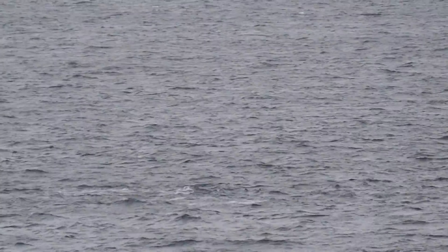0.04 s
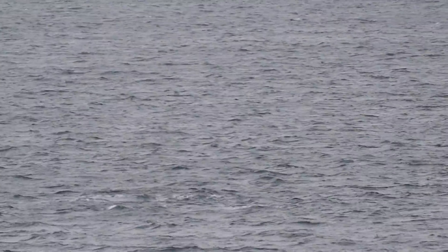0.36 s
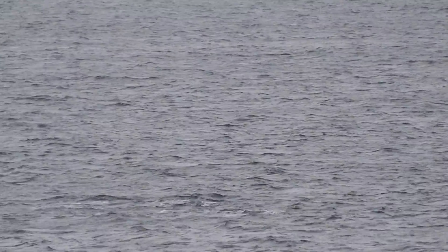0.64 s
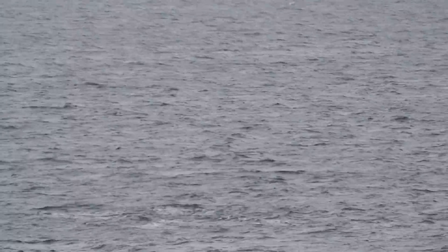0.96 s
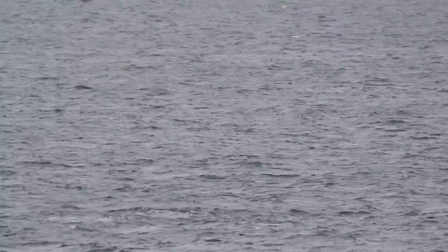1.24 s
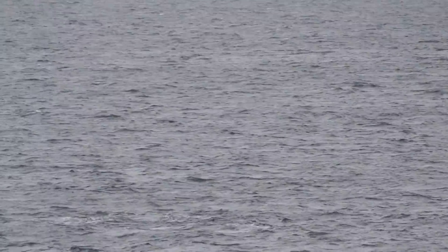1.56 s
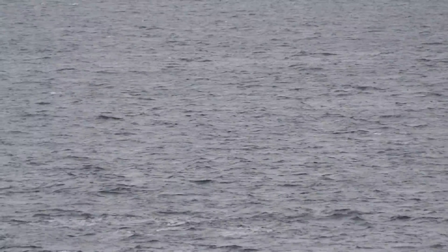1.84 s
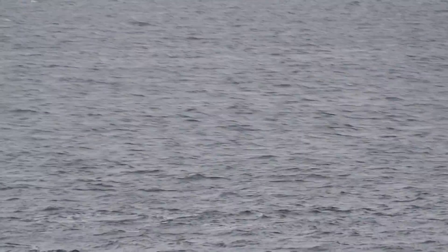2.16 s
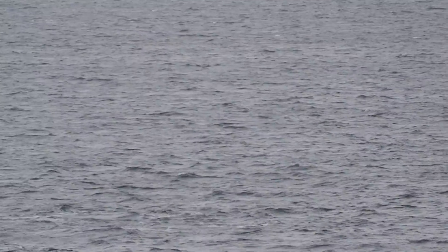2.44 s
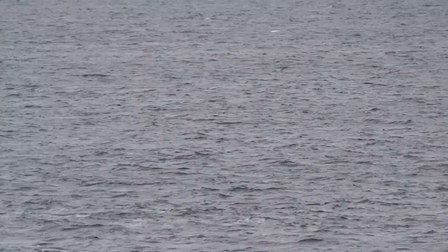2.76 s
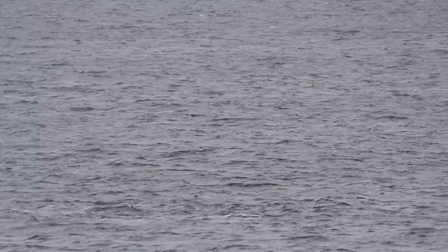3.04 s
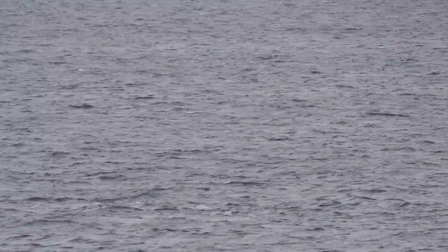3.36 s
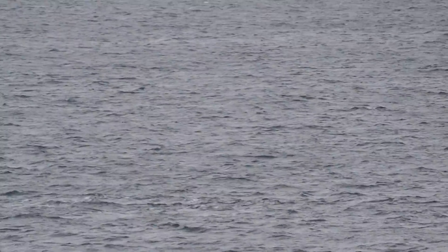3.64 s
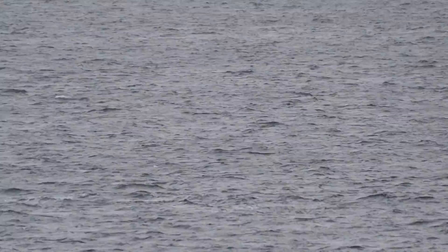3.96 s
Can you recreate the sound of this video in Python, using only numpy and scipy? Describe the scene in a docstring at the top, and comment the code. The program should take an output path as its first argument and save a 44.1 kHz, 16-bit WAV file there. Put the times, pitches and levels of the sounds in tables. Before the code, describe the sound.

Gusty wind buffets the microphone from the start, a loud low rumble with a rough, rapid flutter. Deep thuds come irregularly from about 0.5 to 3 seconds. The hardest gusts rasp and hiss, with brief bright crests near 1 and 1.9 seconds. The heaviest thud lands at 2.5 seconds, just before a sharp spit of air. Gusts continue until the end at 4 seconds, over a barely audible sea wash.

```python
"""Gusty wind off the open sea buffets the two microphone ports of a camera. From the start, big eddies
press on both ports at once (rumble) while smaller ones push one and pull the other (buffeting).
Deep thuds set in at half a second. The hardest gusts tear into a rasp and a thin hiss, with bright
crests near 1 s and 1.9 s. The heaviest thud lands at 2.5 s, just before the loudest spit of air.
The gusts go on to the end, and the faint wash of the water lies under it all."""
import sys
import numpy as np
from scipy import signal
from scipy.fft import rfft, irfft, next_fast_len
from scipy.io import wavfile
from scipy.ndimage import uniform_filter1d, minimum_filter1d, map_coordinates

SR = 44100
rng = np.random.default_rng(int(sys.argv[2]) if len(sys.argv) > 2 else 0)


def log_audio(samples):
    """Write samples as a 16-bit WAV file to the path given in sys.argv[1]."""
    # one column per channel
    frames = np.atleast_2d(samples).T
    # limit to full scale, then quantise
    limited = np.clip(frames, -1, 1)
    pcm = np.round(limited * 32767).astype(np.int16)
    wavfile.write(sys.argv[1], SR, pcm)


N = 176400
TIME = np.arange(N) / SR
FFT_SIZE = next_fast_len(N + 8192)

# Strength of the gusts: (time [s], relative buffeting level [dB], relative rasp level [dB])
GUST_LEVELS = [(0.01, -18.5, -24), (0.03, -21.5, -44), (0.05, -26.5, -36.5), (0.11, -19.5, -36),
               (0.18, -17.5, -25.5), (0.2, -32, -43), (0.22, -17, -25.5), (0.25, -16.5, -25),
               (0.29, -15.0, -34), (0.31, -32, -41), (0.33, -17, -38.5), (0.37, -15.5, -30),
               (0.42, -25, -47), (0.44, -20, -41), (0.46, -36.5, -45), (0.55, -23.5, -44),
               (0.58, -31, -51.0), (0.6, -22, -55), (0.63, -27, -42), (0.64, -17, -46), (0.66, -29.5, -39),
               (0.69, -14.5, -41), (0.71, -28, -37.5), (0.74, -21, -37.5), (0.77, -14.5, -38),
               (0.78, -24.5, -43.5), (0.82, -16, -32), (0.9, -17.5, -28.0), (0.92, -27.5, -44),
               (0.94, -15, -35), (0.96, -43, -43), (0.97, -18.5, -28.5), (1.03, -15.0, -26.5),
               (1.09, -25.5, -32), (1.1, -16, -30), (1.24, -18.5, -35), (1.26, -18.5, -28), (1.3, -13, -25),
               (1.32, -21.5, -30), (1.35, -15, -25), (1.38, -21, -27), (1.47, -15.5, -26.5),
               (1.52, -15.5, -24), (1.54, -16.5, -38), (1.57, -15, -24), (1.61, -18, -37.5),
               (1.63, -31, -46.0), (1.66, -15.5, -27), (1.69, -26.5, -30), (1.74, -15, -21.5),
               (1.79, -19, -32), (1.86, -14.5, -27), (1.92, -21.5, -27.5), (1.97, -12, -27.5),
               (1.99, -17.5, -27), (2.01, -20, -24), (2.02, -22.5, -28), (2.05, -15.5, -34),
               (2.06, -21, -40.5), (2.11, -18.5, -23), (2.17, -20.5, -36), (2.2, -12.5, -22.5),
               (2.22, -25, -41.0), (2.24, -10, -36), (2.26, -28, -40), (2.28, -14, -25.5), (2.32, -27, -41),
               (2.36, -14.5, -37), (2.37, -31, -40), (2.39, -18, -36), (2.41, -24, -39.5),
               (2.44, -13.5, -26.0), (2.47, -26, -42), (2.51, -17.5, -29.5), (2.55, -18.5, -37),
               (2.6, -19.5, -26.5), (2.65, -12, -27.5), (2.67, -25.5, -46.5), (2.7, -14.5, -29),
               (2.75, -30.5, -44), (2.77, -22, -37), (2.8, -20, -28.5), (2.82, -16, -35), (2.85, -35, -47),
               (2.87, -16, -32), (2.91, -19.5, -30.5), (2.95, -17.0, -21.5), (2.97, -14.5, -41.5),
               (3.01, -24.5, -33), (3.03, -18, -21), (3.06, -17.5, -35.5), (3.08, -21.5, -26),
               (3.1, -25, -45), (3.12, -19.5, -27.5), (3.22, -17.5, -27.5), (3.24, -33, -38),
               (3.25, -17, -36), (3.3, -18.5, -26.5), (3.51, -13.5, -29.5), (3.53, -25.5, -33.5),
               (3.55, -14, -34), (3.6, -20.5, -34), (3.65, -25, -34), (3.67, -15.5, -30), (3.69, -15, -41),
               (3.73, -31.5, -48), (3.76, -23, -34), (3.78, -20, -31), (3.79, -24, -38), (3.82, -18, -26),
               (3.9, -18.5, -33.5), (3.99, -16.5, -27.5)]
# Single hard eddies: (time [s], relative buffeting level [dB], relative rasp level [dB])
EDDY_SLAPS = [(0.018, -15, -29), (0.107, -14, -21), (0.381, -11, -23), (0.474, -13, -38), (0.516, -18, -42),
              (0.756, -13, -25), (0.975, -12.5, -24), (1.014, -16, -24), (1.126, -10, -24),
              (1.264, -10, -29), (1.485, -14, -19), (1.526, -13, -22), (1.639, -11, -30), (1.704, -15, -20),
              (1.961, -12.5, -24), (2.113, -8.5, -27), (2.2, -17, -25), (2.279, -16, -24),
              (2.336, -14, -37), (2.389, -11, -36), (2.592, -9.5, -24), (2.71, -14, -28),
              (2.884, -8.5, -33.5), (2.932, -18, -21), (3.021, -14, -28), (3.662, -18.5, -25),
              (3.766, -9, -25), (3.824, -9, -31)]
# Strength of the hiss and of the large eddies' pressure: (time [s], relative level [dB])
HISS_LEVELS = [(0.02, -68), (0.13, -66), (0.24, -60), (0.3, -67), (0.35, -60), (0.41, -67.5), (0.6, -66),
               (0.7, -63), (0.79, -67), (0.84, -61.5), (0.86, -56.5), (0.95, -65.5), (0.97, -59.5),
               (1.04, -55.5), (1.07, -76), (1.1, -58.5), (1.24, -66), (1.28, -56), (1.33, -61), (1.37, -58),
               (1.42, -64), (1.46, -59), (1.49, -54), (1.62, -65), (1.74, -59), (1.8, -65.5), (1.83, -59.5),
               (1.85, -71.5), (1.86, -54.5), (1.87, -67), (1.95, -58), (2.01, -61), (2.07, -74),
               (2.1, -57.5), (2.26, -67.5), (2.28, -59), (2.41, -74), (2.43, -59), (2.52, -75.5),
               (2.55, -74.5), (2.56, -63), (2.58, -64), (2.64, -60.5), (2.67, -66), (2.86, -67),
               (2.95, -61), (2.97, -73.5), (3.03, -57), (3.06, -64.5), (3.25, -64), (3.38, -61),
               (3.52, -67), (3.63, -68.5), (3.66, -63), (3.71, -77), (3.76, -68.5), (3.85, -64),
               (3.91, -68.5), (3.97, -66)]
RUMBLE_LEVELS = [(0.02, -11.5), (0.06, -20.5), (0.14, -15), (0.21, -22.5), (0.28, -19.5), (0.32, -22),
                 (0.38, -15), (0.4, -21.5), (0.52, -20), (0.59, -26.5), (0.64, -18.5), (0.67, -27),
                 (0.73, -22), (0.78, -23.5), (0.8, -19.5), (1.0, -17), (1.12, -16.5), (1.39, -19),
                 (1.41, -14.5), (1.52, -22.5), (1.55, -15.5), (1.61, -19.5), (1.64, -17), (1.72, -22.5),
                 (1.78, -18.5), (1.88, -17.5), (1.91, -18), (1.94, -15), (2.03, -21.5), (2.07, -13),
                 (2.14, -19.5), (2.39, -16), (2.42, -20), (2.69, -18), (2.71, -15.5), (2.74, -26.5),
                 (2.76, -13), (2.84, -27.5), (2.87, -16), (3.03, -20.5), (3.04, -20.5), (3.27, -17.5),
                 (3.3, -19.5), (3.5, -19), (3.52, -26.5), (3.55, -17), (3.63, -24.5), (3.67, -14.5),
                 (3.74, -24.5), (3.76, -14.5), (3.79, -18), (3.98, -17.5)]
# Big eddies that land as a thud: (time [s], level [dB])
EDDY_THUDS = [(.478, -18.5), (.935, -15.5), (1.129, -18), (1.57, -18), (1.645, -15.5), (2.115, -15),
              (2.39, -17.5), (2.495, -12.5), (2.71, -17.5), (2.965, -19)]
# Tearing gust crests and sharp spits of air: (time [s], level [dB], half-width [s])
CREST_TEARS = [(.225, -50, .012), (.868, -45, 0.017), (1.022, -39, 0.012), (1.292, -45, 0.013),
               (1.375, -50, .018), (1.495, -48, 0.034), (1.735, -52, .02), (1.865, -50, .008),
               (1.93, -40.5, 0.0073), (2.945, -47, .016)]
AIR_SPITS = [(.385, -50.5, 0.00079), (0.76, -50, 0.0023), (.972, -46, .0012), (.98, -48.5, 0.0019),
             (1.032, -48, 0.0016), (1.132, -46.5, 0.0015), (1.259, -46.5, 0.0012), (1.526, -49, 0.0017),
             (1.704, -49.5, .0015), (1.862, -48.5, 0.0027), (1.931, -47.5, 0.0061), (2.103, -49, .002),
             (2.117, -45.5, .0015), (2.564, -39.5, 0.0015), (2.602, -46, .0012), (2.934, -50, .0012),
             (3.024, -55, 0.0035), (3.877, -56, 0.0028)]
# Noise spectrum of each source: (frequency [Hz], relative spectral density [dB])
BUFFET_SPECTRUM = [(40, -15.5), (110, -10.5), (200, 1), (330, 0.5), (520, -5), (800, -13.5), (1200, -27),
                   (2200, -56.5), (5000, -97)]
RASP_SPECTRUM = [(250, -52), (600, 7.5), (950, 2), (1400, -7), (2000, -16), (3000, -28), (4500, -39.5),
                 (8000, -53), (15000, -75.5)]
HISS_SPECTRUM = [(800, -18), (2500, 5), (4500, -3), (7000, -5), (10000, -9), (13500, -15), (15000, -12.5),
                 (15800, -19.5)]
RUMBLE_SPECTRUM = [(8, -15.5), (25, -6.5), (55, -0.5), (110, 0), (170, -3.5), (260, -11.5), (500, -36.5),
                   (1200, -72.5)]
THUD_SPECTRUM = [(70, -30), (130, -1), (175, -0.5), (240, -6.5), (400, -32), (900, -76.5)]
TEAR_SPECTRUM = [(900, -21), (1800, 6), (2700, 2.5), (3500, -6), (4500, -16), (8000, -34), (15000, -51.5)]
SPIT_SPECTRUM = [(300, -10.5), (2000, 12.5), (5000, 4.5), (11000, -5.5), (16000, -8.5)]
SEA_SPECTRUM = [(100, 22), (600, 2), (2000, 1.5), (5000, -34), (15000, -42.5)]
# Likeness of the two ports under small eddies: (frequency [Hz], coherence [0-1])
PORT_COHERENCE = [(120, 0.42), (300, 0.51), (800, 0.7), (1300, 0.54), (2000, 0.42), (5000, 0.6)]
# Phase of the right port ahead of the left: (frequency [Hz], lead [rad])
PORT_PHASE = [(120, 2.53), (300, 2.66), (600, 2.96), (1200, 2.59), (2000, 1.78), (3000, 0.94), (6000, 0.37)]

BUFFET_DB, RASP_DB, HISS_DB, SLAP_DB, RUMBLE_DB, SEA_DB = 1.5, 1.5, 4, -2.5, 0.28, -60
BUFFET_PAN_DB, RASP_PAN_DB, HISS_PAN_DB, RUMBLE_PAN_DB = -1.33, 0.2, 0.7, -2.5  # left over right


def turbulence():
    """Common modulation: the same eddies shake buffeting, rasp and hiss. Gusts and slaps add in power."""
    slaps = sum(amp(SLAP_DB + np.array([[buffet_db], [rasp_db]])) * slap(TIME - at_s)
                for at_s, buffet_db, rasp_db in EDDY_SLAPS)
    buffet_drive, rasp_drive = np.hypot(amp(curves(GUST_LEVELS)), slaps)
    eddies = np.tanh(eddy_train(per_second=160, fade_s=0.0067))
    flutter = np.tanh(wobble(190))
    crackle = wobble(600)
    return (buffeting(buffet_drive, swing_db=4.2 * eddies + 3.3 * flutter)
            + rasp(rasp_drive, swing_db=3.17 * eddies + 3.2 * flutter + 1.7 * crackle)
            + hiss(swing_db=2.8 * eddies + 2.3 * flutter + 1.5 * crackle))


def slap(t, attack_s=0.0022, decay_s=0.0085):
    """Pressure transient: the envelope of one eddy rises fast to its peak at t = 0 and falls slower."""
    return np.exp(-(np.minimum(t, 0) / attack_s) ** 2 - (np.maximum(t, 0) / decay_s) ** 2)


def eddy_train(per_second, fade_s):
    """Shot noise: eddies arrive at random and decay exponentially; mean 0, rms 1."""
    onsets = (rng.random(int(per_second * N / SR)) * N).astype(int)
    arrivals = np.bincount(onsets, minlength=N)
    train = filtered(arrivals - arrivals.mean(), lambda hz: 1 / (1 + 2j * np.pi * hz * fade_s))
    return unit(uniform_filter1d(train, size=40))


def buffeting(drive, swing_db):
    """Near antiphase: smaller eddies push one port while pulling the other."""
    flow = port_noise(BUFFET_SPECTRUM, PORT_COHERENCE, PORT_PHASE) * amp(swing_db)
    return amp(BUFFET_DB) * drive * pan(BUFFET_PAN_DB) * steadied(flow, span_s=0.067)


def rasp(drive, swing_db):
    """Roughness: fast amplitude modulation turns the midrange noise of hard gusts into a rasp."""
    flow = port_noise(RASP_SPECTRUM, PORT_COHERENCE, PORT_PHASE) * amp(swing_db)
    return amp(RASP_DB) * drive * pan(RASP_PAN_DB) * steadied(flow, span_s=0.068)


def hiss(swing_db):
    """Broadband flow noise: thin treble, nearly coherent at the ports, flickers with the eddies."""
    level_db, = curves(HISS_LEVELS)
    flow = port_noise(HISS_SPECTRUM, coherence=[(3000, 0.95), (9000, 0.97)]) * unit(amp(swing_db))
    return amp(HISS_DB + level_db) * pan(HISS_PAN_DB) * flow


def rumble():
    """Spatial coherence: large eddies press on both ports in phase."""
    level_db, = curves(RUMBLE_LEVELS)
    pressure = port_noise(RUMBLE_SPECTRUM, coherence=[(60, 0.99), (180, 0.78)])
    return amp(RUMBLE_DB + level_db) * pan(RUMBLE_PAN_DB) * steadied(pressure, span_s=0.074)


def thuds(half_width_s=0.014):
    """Pressure pulses: single big eddies land as short bursts of low-frequency noise."""
    envelope = sum(amp(db) * np.exp(-((TIME - at_s) / half_width_s) ** 2) for at_s, db in EDDY_THUDS)
    pressure = port_noise(THUD_SPECTRUM, coherence=[(170, 0.4)])
    return envelope * pan(RUMBLE_PAN_DB) * steadied(pressure, span_s=0.035)


def tears():
    """Flow separation: at gust crests the air tears at the port edges with a bright crackle."""
    envelope = sum(amp(db) * np.exp(-((TIME - at_s) / half_width_s) ** 2)
                   for at_s, db, half_width_s in CREST_TEARS)
    flow = port_noise(TEAR_SPECTRUM, PORT_COHERENCE, PORT_PHASE)
    crackle = amp(4 * np.tanh(wobble(450)))
    return envelope * unit(flow * crackle)


def spits():
    """Broadband transients: puffs of air at the ports rise and fall exponentially in milliseconds."""
    envelope = sum(amp(db) * np.exp(-np.abs(TIME - at_s) / half_width_s)
                   for at_s, db, half_width_s in AIR_SPITS)
    return envelope * port_noise(SPIT_SPECTRUM, coherence=[(5000, 0.87)])


def sea():
    """Nearly stationary noise: the faint wash of the water wavers only slightly in level."""
    level_db = SEA_DB + 1.2 * wobble(4.2)
    return amp(level_db) * port_noise(SEA_SPECTRUM, coherence=[(200, 0.9), (5000, 0.7)])


def port_noise(spectrum, coherence, lead=None):
    """Partial coherence: the ports get the sum and difference of two independent noises; rms 1."""
    hz = np.fft.rfftfreq(FFT_SIZE, 1 / SR)
    mix_angle = np.arccos(np.clip(along(coherence, hz), -1, 1)) / 2
    noises = rfft(rng.standard_normal((2, FFT_SIZE))) * amp(along(spectrum, hz))
    common, opposed = noises * [np.cos(mix_angle), np.sin(mix_angle)]
    phase_shift = 1 if lead is None else np.exp(1j * along(lead, hz))
    ports = np.array([common + opposed, (common - opposed) * phase_shift])
    return unit(irfft(ports, FFT_SIZE)[:, :N])


def steadied(x, span_s):
    """Division by the running rms removes slow swells, so that an envelope alone sets the level."""
    window = signal.windows.hann(int(span_s * SR))
    power = signal.fftconvolve(np.mean(x ** 2, axis=0), window / window.sum(), "same")
    return x / np.sqrt(np.abs(power) + 1e-9)


def wobble(knots_per_s):
    """Smooth random modulation: a spline through Gaussian values."""
    return map_coordinates(rng.standard_normal(4096), [TIME * knots_per_s], mode="wrap")


def filtered(x, response):
    """Linear filtering: the spectrum of x times a complex frequency response."""
    hz = np.fft.rfftfreq(FFT_SIZE, 1 / SR)
    return irfft(rfft(x, FFT_SIZE) * response(hz), FFT_SIZE)[..., :N]


def along(points, hz):
    """Interpolation of (frequency [Hz], value) points on a logarithmic frequency axis."""
    frequencies, values = np.transpose(points)
    return np.interp(np.log(hz + 1), np.log(frequencies + 1), values)


def curves(rows):
    """Linear interpolation in time: one value per sample for each column after the first."""
    times, *columns = np.transpose(rows)
    return [np.interp(TIME, times, column) for column in columns]


def pan(db):
    """Level difference, left over right, as the gains of the two ports."""
    return amp(np.array([[db], [-db]]) / 2)


def amp(db):
    """Amplitude ratio of a level in decibels."""
    return 10 ** (np.asarray(db) / 20)


def unit(x):
    """Normalisation to rms 1."""
    return x / np.sqrt(np.mean(x ** 2) + 1e-20)


def scene():
    """Superposition: the wind pressures at the ports add to the sound of the sea."""
    return turbulence() + rumble() + thuds() + tears() + spits() + sea()


def limited(x, ceiling_db, hold_s):
    """Look-ahead limiting: one smoothed gain ducks both channels under the ceiling."""
    size = int(hold_s * SR)
    needed_gain = np.minimum(1, amp(ceiling_db) / (np.abs(x).max(axis=0) + 1e-9))
    held_gain = minimum_filter1d(needed_gain, 2 * size)
    return x * uniform_filter1d(uniform_filter1d(held_gain, size), size)


def record(dry, band_limit_hz=15800, fade_s=0.004):
    """Peak and band limiting: the camera ducks peaks and cuts the top treble; the ends fade briefly."""
    fade = np.minimum(1, np.minimum(TIME, TIME[::-1]) / fade_s)
    ducked = limited(dry, ceiling_db=0.6, hold_s=0.0084)
    return filtered(fade * ducked, lambda hz: hz < band_limit_hz)


dry = scene()
out = record(dry)
log_audio(out)
```